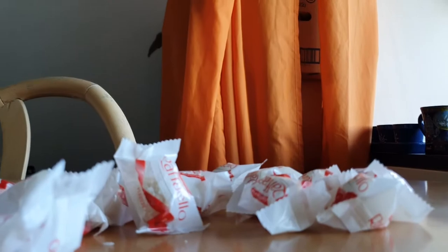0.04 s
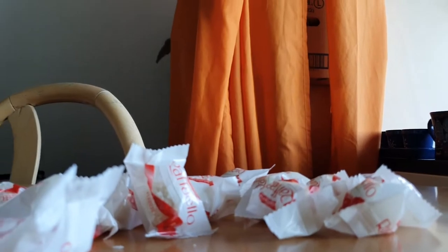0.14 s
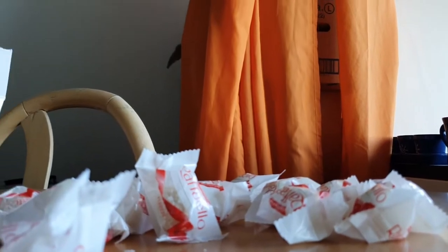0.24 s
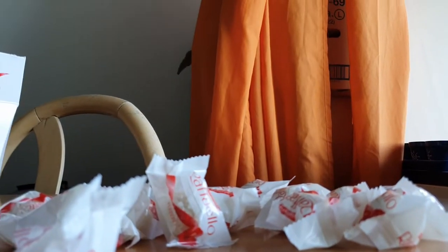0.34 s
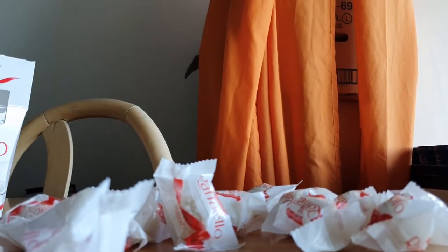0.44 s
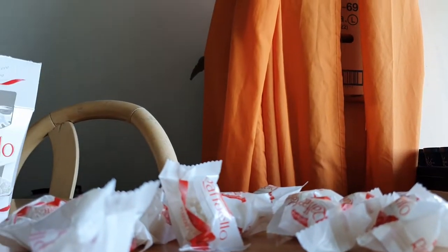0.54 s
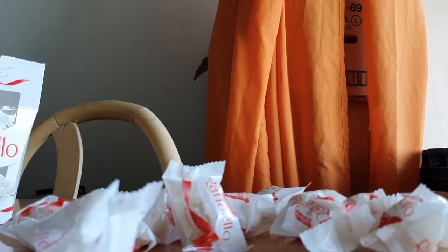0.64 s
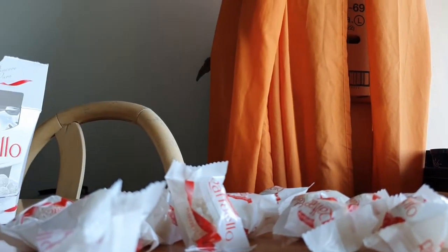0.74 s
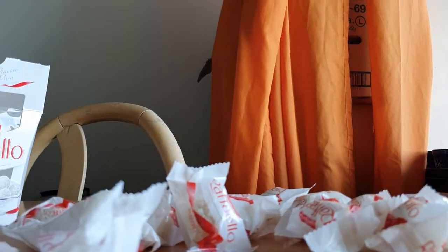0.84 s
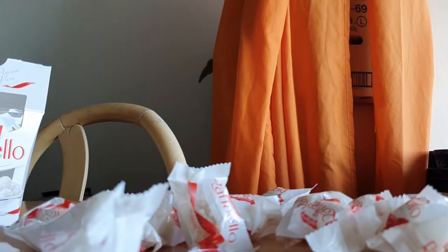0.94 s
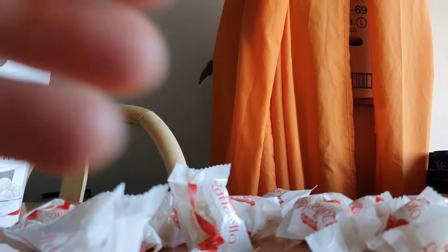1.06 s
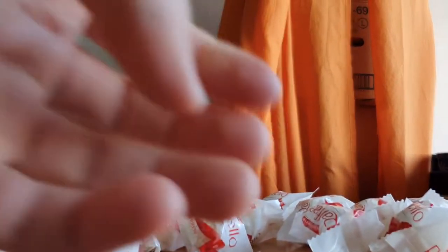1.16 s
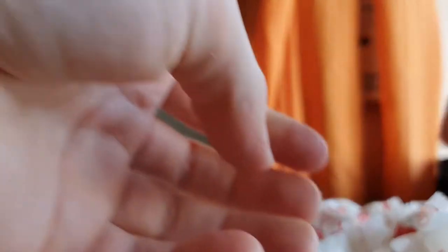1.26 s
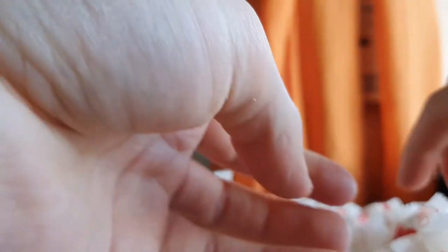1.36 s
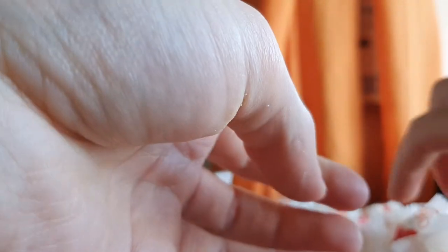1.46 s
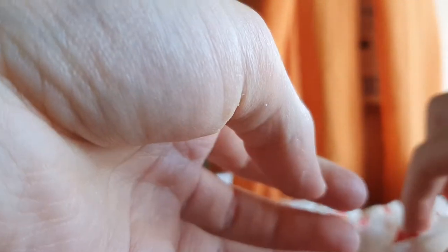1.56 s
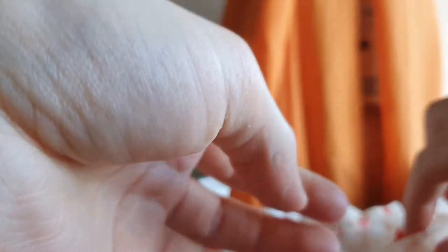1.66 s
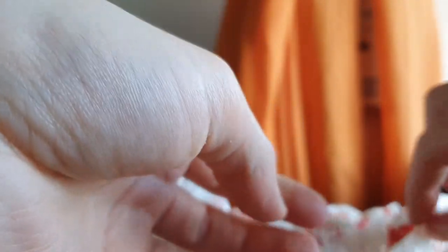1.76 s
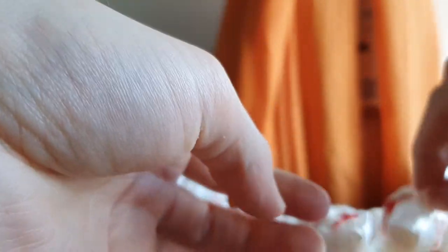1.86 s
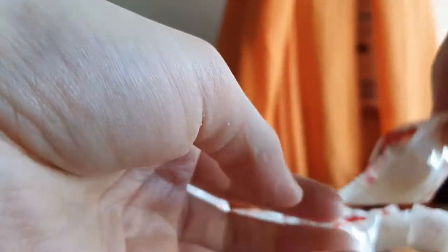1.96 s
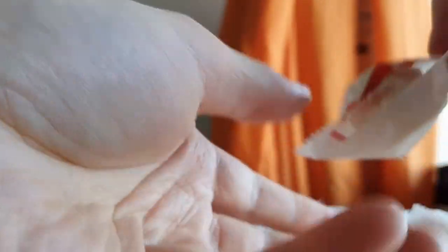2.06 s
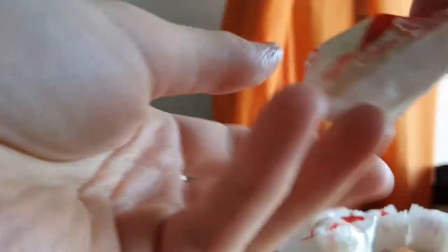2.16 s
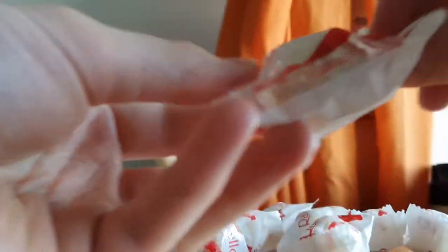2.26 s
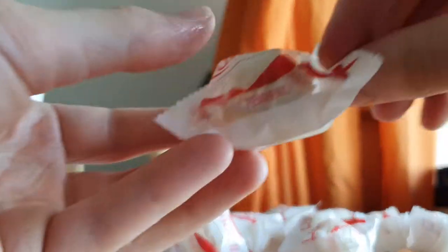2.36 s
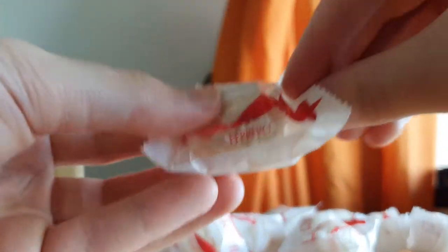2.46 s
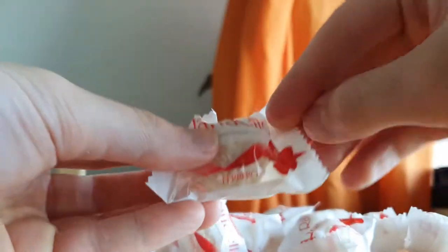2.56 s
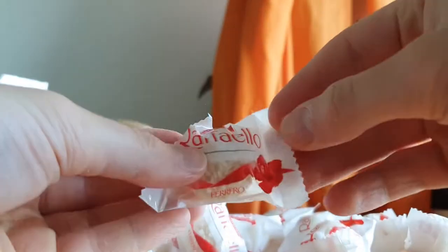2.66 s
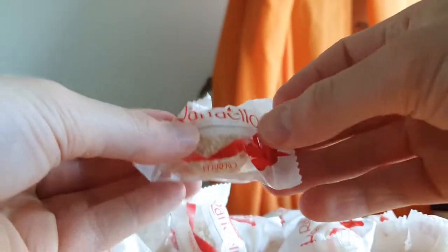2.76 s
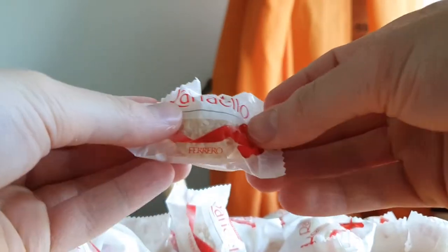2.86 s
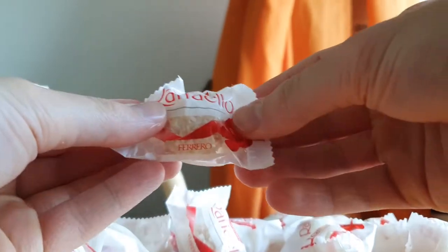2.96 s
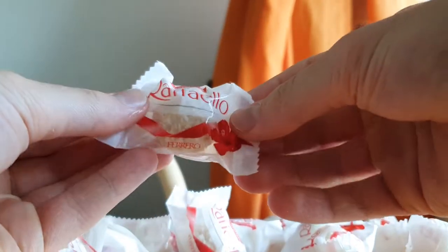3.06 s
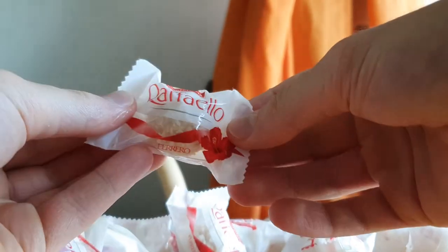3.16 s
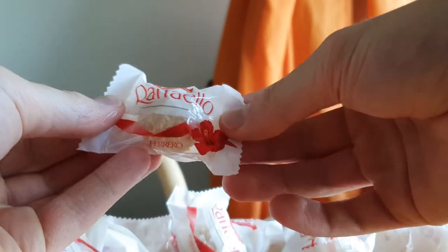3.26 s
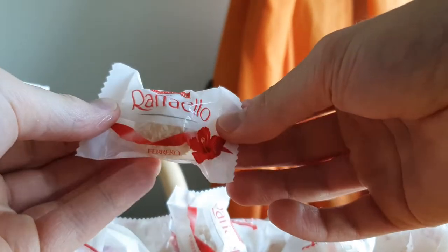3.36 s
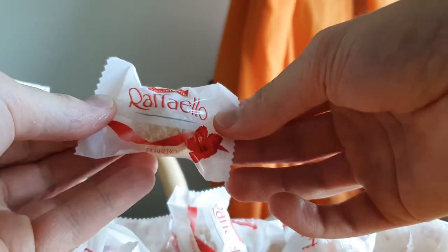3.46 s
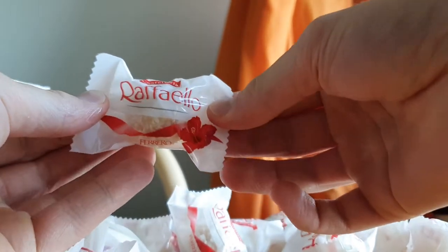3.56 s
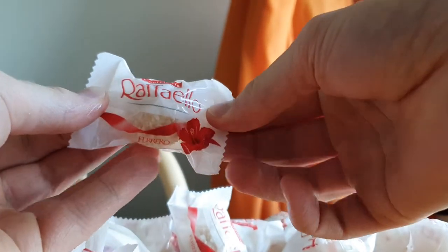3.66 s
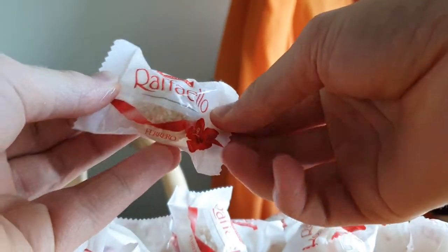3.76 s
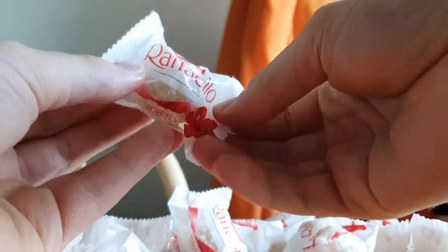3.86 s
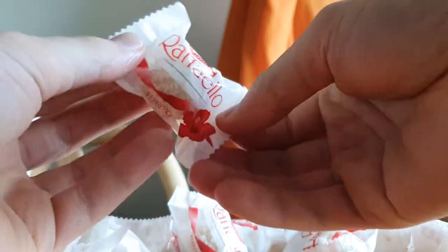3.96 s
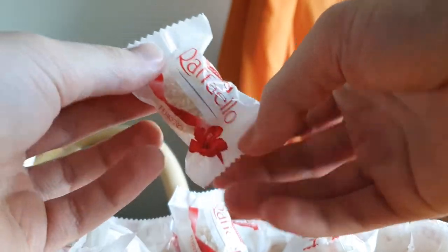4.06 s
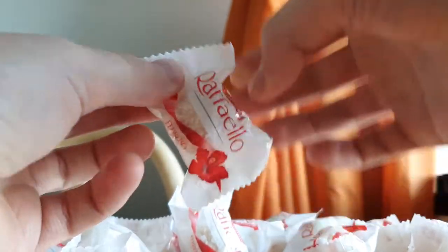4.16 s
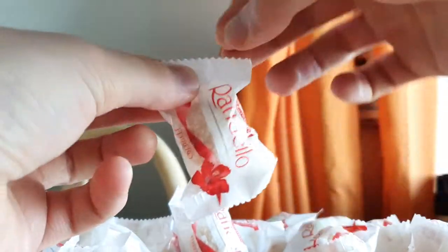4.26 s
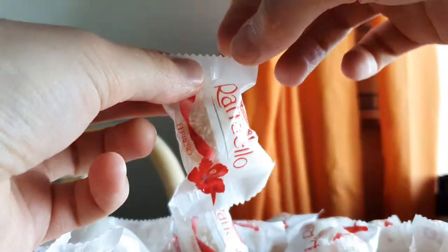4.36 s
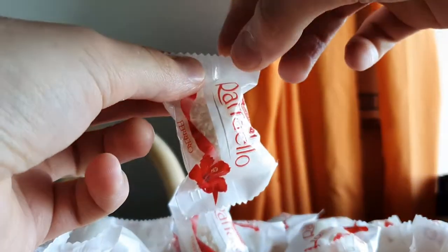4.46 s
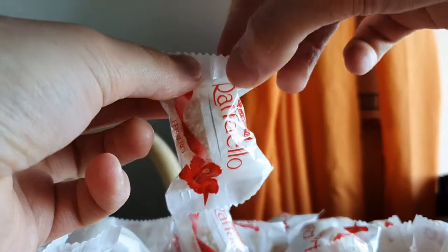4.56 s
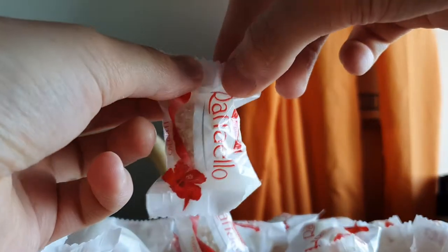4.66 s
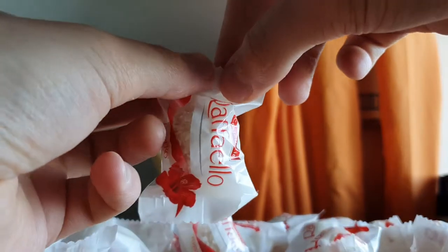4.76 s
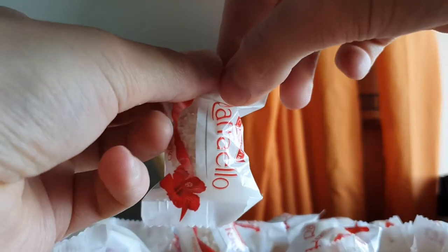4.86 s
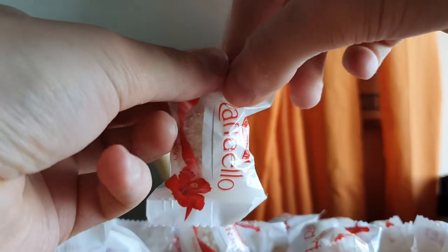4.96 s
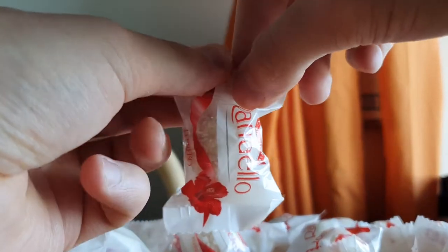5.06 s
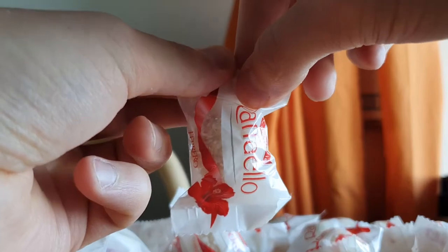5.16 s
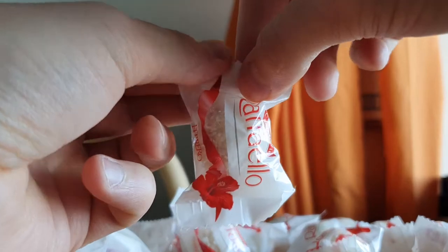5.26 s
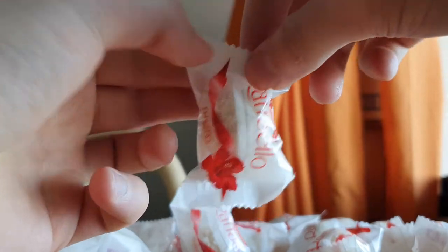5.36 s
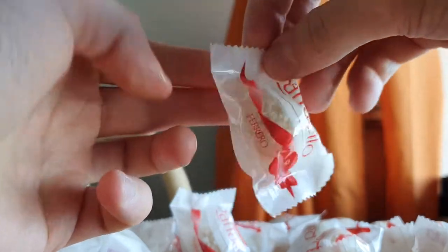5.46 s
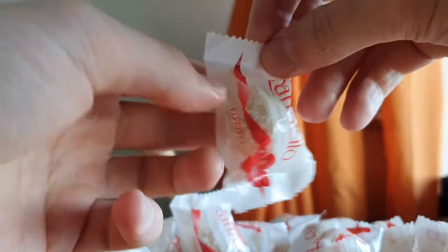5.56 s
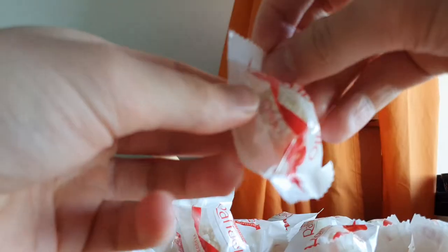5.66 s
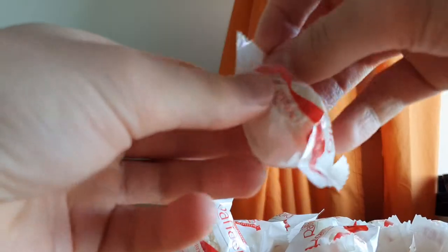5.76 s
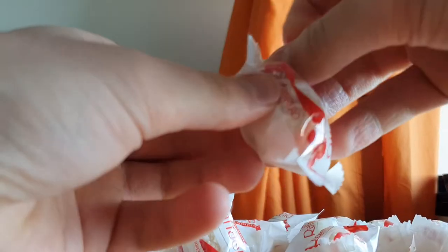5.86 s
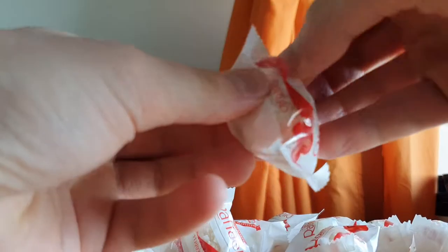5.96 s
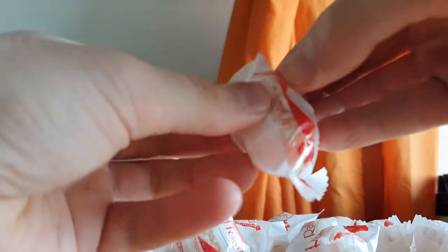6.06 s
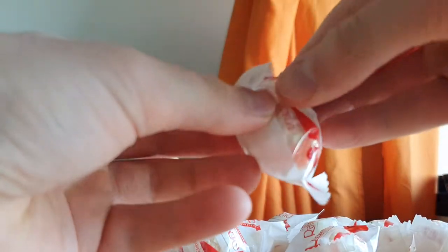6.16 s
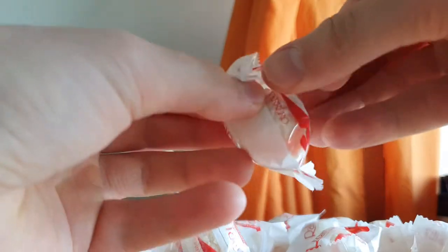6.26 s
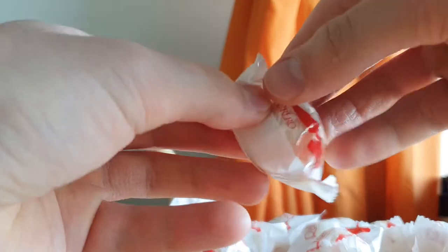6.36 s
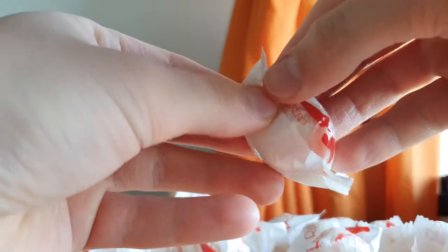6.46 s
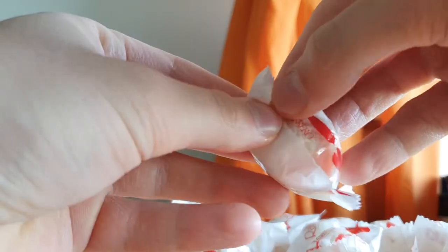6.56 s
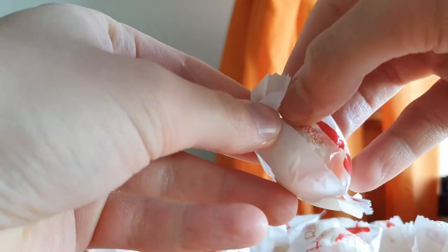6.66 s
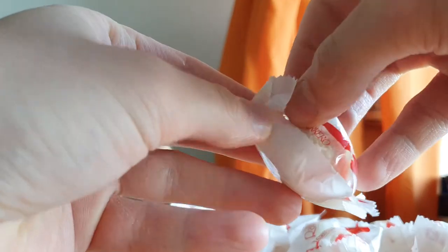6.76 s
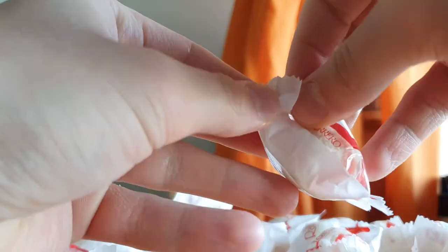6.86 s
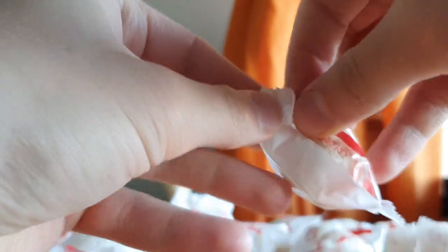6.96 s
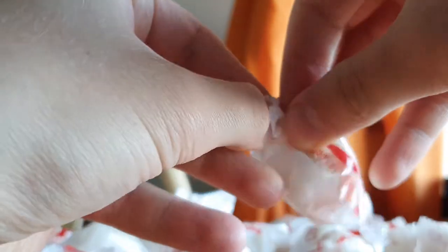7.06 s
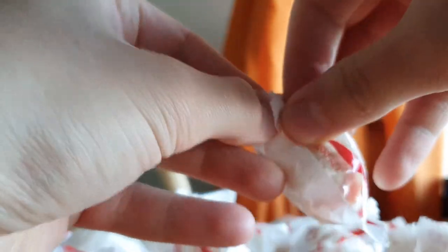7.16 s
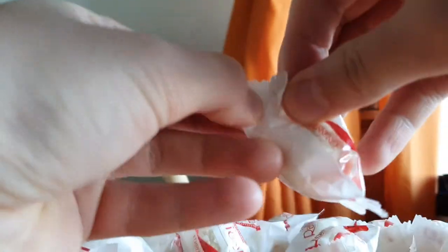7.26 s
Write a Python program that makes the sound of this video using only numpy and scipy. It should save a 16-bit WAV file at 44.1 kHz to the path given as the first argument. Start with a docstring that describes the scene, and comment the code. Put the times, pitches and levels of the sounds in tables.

```python
"""Small room: two hands pull open a sweet in a stiff plastic wrapper, close to a pair of microphones.
Large creases buckle one by one: noise bursts crack and sizzle, damped modes make the pouch pop hollowly.
Smaller creases crackle between them; coloured hiss is moving hands and sleeves, then rubbed film.
Short low sines are the sweet being knocked about, low-passed noise is the rumble of hands and room.
Decaying noise bands add the room's short bright tail."""
import sys
import numpy as np
from scipy import signal
from scipy.fft import rfft, irfft
from scipy.io import wavfile

SR = 44100
rng = np.random.default_rng(int(sys.argv[2]) if len(sys.argv) > 2 else 0)


def persist_wave(psi):
    """Save psi, clipped to +-1, as 16-bit WAV."""
    counts = np.round(np.clip(psi, -1, 1) * 32767).astype(np.int16)
    wavfile.write(sys.argv[1], SR, np.atleast_2d(counts).T)


N = 322371


def from_db(db):
    """Decibels to amplitude gain."""
    return 10 ** (np.asarray(db) / 20)


def rms_one(x):
    """Scale to rms 1."""
    return x / np.sqrt(np.mean(x ** 2) + 1e-20)


def in_time(rows):
    """Interpolate each column of a time table to every sample."""
    knot_s, *columns = np.transpose(rows)
    return [np.interp(np.arange(N) / SR, knot_s, column) for column in columns]


def at_hz(points, hz, axis=1):
    """Read a table column on a log-frequency axis."""
    points = np.array(points)
    return np.interp(np.log(np.maximum(hz, 1)), np.log(points[:, 0]), points[:, axis])


def band(x, edges_hz, order=2):
    """Causal band-pass."""
    return signal.sosfilt(signal.butter(order, edges_hz, "band", fs=SR, output="sos"), x)


def colour(x, points):
    """Minimum-phase filter with the tabulated gain, from a folded cepstrum."""
    size = 4096
    hz = np.arange(size // 2 + 1) * SR / size
    cepstrum = irfft(np.log(from_db(at_hz(points, hz))))
    cepstrum[1:size // 2] *= 2
    cepstrum[size // 2 + 1:] = 0
    response = irfft(np.exp(rfft(cepstrum)))
    return signal.fftconvolve(x, response[None], axes=1)[:, :N]


def pair_noise(shape, alike):
    """Left and right white noise with correlation alike."""
    alike = np.clip(alike, 0, 1)
    mid, side = rng.standard_normal((2, *shape))
    return np.sqrt((1 + alike) / 2) * mid + np.sqrt((1 - alike) / 2) * np.array([side, -side])


def drift(knots_per_s):
    """Random curve about 0: unit-variance knots joined by straight lines."""
    knots = rng.standard_normal(8192)
    return np.interp(np.arange(N) / SR * knots_per_s, np.arange(len(knots)), knots)


def flip(age_s, rise_s, decay_s):
    """Exponential rise up to age 0, exponential decay after it."""
    return np.exp(np.minimum(age_s / rise_s, -age_s / decay_s))


# Low rumble of the moving hands and the room: t/s, level/dB
RUMBLE = [(0.0, -68.5), (0.53, -73.5), (1.79, -59.5), (2.52, -62), (2.69, -57.5), (3.13, -55), (3.64, -59),
          (3.91, -55), (4.38, -63), (4.99, -56.5), (5.29, -65), (5.35, -55), (5.76, -60), (5.8, -52),
          (5.86, -58.5), (7.31, -59)]
# Rumble filter: f/Hz, gain/dB
RUMBLE_COLOUR = [(15, -20), (25, -13), (39, -8), (93, -3), (189, -1), (236, -3.5), (271, -1), (487, -13),
                 (600, -13), (700, -10.5), (910, -39), (1540, -120)]


def rumble(level_db, lumpy_db=2):
    """Soft, lumpy low noise, nearly the same at both microphones."""
    lumpy = pair_noise((N,), .89) * from_db(lumpy_db * drift(30))
    noise = colour(lumpy, RUMBLE_COLOUR)
    return rms_one(noise) * from_db(in_time(RUMBLE)[0] + level_db)


# Rustle level before trims: moving hands, sleeves and quiet hiss at first, handled film from 1.6 s;
# drives rubbing and fine crackle: t/s, pouch/dB, crack/dB, sizzle/dB
RUSTLE = [(0.0, -66.5, -59, -74), (0.25, -76.5, -76, -82.5), (0.48, -75.5, -75, -78.5),
          (0.72, -79, -68.5, -73), (0.95, -79, -82, -82), (1.2, -76, -65.5, -79.5), (1.55, -65.5, -61, -74),
          (1.8, -53, -47, -60), (2.0, -61, -58, -67), (2.2, -47.5, -57, -60), (2.42, -69.5, -56, -60),
          (2.8, -41.5, -50, -61), (3.2, -51.5, -48.5, -48.5), (3.66, -59, -51, -61),
          (3.95, -38, -42, -40.5), (4.2, -65, -56, -61.5), (4.43, -71.5, -75, -77), (4.62, -61, -63, -72.5),
          (4.9, -46.5, -46, -52), (5.2, -77, -70, -79), (5.42, -47.5, -50, -50.5), (5.8, -55.5, -45, -46),
          (6.1, -47.5, -39, -43), (6.38, -57.5, -45.5, -42.5), (6.48, -56.5, -55, -55),
          (6.62, -54, -44, -43), (6.95, -62.5, -52.5, -48.5), (7.158, -61.5, -50, -41.5),
          (7.31, -52, -41, -39)]
# Rubbing filter: f/Hz, gain/dB
RUSTLE_COLOUR = [(400, 1), (620, 0), (780, 2.5), (1050, 5), (1420, -4.5), (1760, -6.5), (2200, -6),
                 (3000, -4.5), (4000, 2.5), (5000, -5), (6200, -4), (9100, -5.5), (10400, -5.5),
                 (12200, -1.5), (16000, -11)]
# Rows pouch, crack, sizzle: low edge f/Hz, high edge f/Hz
RANGES = [(400, 2200), (2200, 7000), (7000, 17000)]
# Rubbing relative to rustle level: pouch/dB, crack/dB, sizzle/dB
RUB_DB = (-1.5, -2, 2)
# Hard-worked film buckles rather than slides: above the knee, rubbing loses this share of the dB rise
RUB_KNEE_DB, RUB_LAG = -64, (0.26, 0.33, 0.76)


def sliding(uneven_db, flicker_db=1.0):
    """Hands and sleeves, then skin on film, rub with an uneven hiss that keeps changing colour."""
    out = 0
    grip = from_db(uneven_db * (drift(130) + drift(23)) / np.sqrt(2))
    correlations = (.65, .2, .1)
    for edges_hz, rustle_db, trim_db, lag, alike in zip(RANGES, in_time(RUSTLE), RUB_DB, RUB_LAG, correlations):
        hiss = colour(band(pair_noise((N,), alike), edges_hz, order=3), RUSTLE_COLOUR)
        rub_db = rustle_db - lag * np.maximum(rustle_db - RUB_KNEE_DB, 0)
        out = out + rms_one(hiss) * from_db(rub_db + trim_db + flicker_db * drift(52))
    return out * grip


SNAP_S, LEAD_S = .025, .006  # burst length; part of it before the flip
LEVEL_S = .004  # time over which a burst's energy is referred to its level
AGE_S = np.arange(int(SNAP_S * SR)) / SR - LEAD_S


def at_level(bursts, db):
    """Give each stereo burst the energy of its level held for LEVEL_S."""
    energy = (bursts ** 2).sum(-1).mean(0) / (LEVEL_S * SR)
    return bursts * (from_db(db) / np.sqrt(energy + 1e-20))[:, None]


# Envelopes: rise/s, first decay/s, flutter level/dB, flutter decay/s
POP_SHAPE = (.0003, .001, -12, .003)
CRACK_SHAPE = (.0003, .0009, -7, .0026)
SIZZLE_SHAPE = (.0002, .0005, -11, .0022)


def crack(db, edges_hz, shape, alike, facet_db=3, lead_in_db=-9.5):
    """A soft, faint lead-in, then a noise burst of about a millisecond and a fluttering tail."""
    rise_s, decay_s, flutter_db, flutter_s = shape
    early, size, phase = rng.random((len(db), 3)).T[:, :, None]
    main = flip(AGE_S, rise_s, decay_s)
    flutter = from_db(flutter_db) * flip(AGE_S, rise_s, flutter_s)
    lead_in = from_db(lead_in_db) * flip(AGE_S + early * LEAD_S, rise_s, decay_s)
    waves = pair_noise((len(db), len(AGE_S)), alike) * (main + flutter + lead_in)
    # the flipping facet rings for a few cycles at a pitch set by its size
    facet_hz = edges_hz[0] * (edges_hz[1] / edges_hz[0]) ** size
    facet = np.sin(2 * np.pi * (facet_hz * AGE_S + phase)) * main
    # scaled to the share of the noise that the band passes
    facet = facet * from_db(facet_db) * np.sqrt(np.diff(edges_hz) / (SR / 2))
    return at_level(band(waves + facet, edges_hz, order=3), db)


# Pouch resonances: multiple of crease pitch, level/dB, t60/s
POUCH_MODES = [(.55, -17.5, 0.0096), (.8, -6.5, .013), (1.03, -1, .011), (1.48, -9, .019)]


def pop(hz, db, spread_db, detune, rough_db):
    """The flip kicks the pouch, whose heavily damped modes shift as it is bent."""
    out = 0
    for multiple, mode_db, t60_s in POUCH_MODES:
        strength, shift, tilt = rng.standard_normal((len(hz), 3)).T[:, :, None]
        mode_hz = hz[:, None] * multiple * np.exp(detune * shift)
        wall = np.sin(2 * np.pi * mode_hz * AGE_S)
        wall = wall * flip(AGE_S, POP_SHAPE[0], t60_s / np.log(1000))
        # sound follows wall acceleration, so little is radiated below each mode
        wave = np.gradient(np.gradient(wall, axis=1), axis=1) / multiple ** 2
        sides = from_db(0.81 * np.array([tilt, -tilt]))
        out = out + sides * wave * from_db(mode_db + spread_db * strength)
    grain = crack(db + rough_db, RANGES[0], POP_SHAPE, alike=0.92)
    return at_level(band(out, [450, 2300], order=3), db) + grain


# Wrapper position: t/s, mean lead of the left microphone/ms
PLACE = [(1.7, -0.091), (2.3, 0.046), (3.2, 0.14), (4.8, .15), (5.8, .08), (7.31, 0.056)]


def buckles(rows):
    """Buckling creases, each a pop, a crack and a sizzle from its own spot on the wrapper."""
    start_s, hz, pop_db, crack_db, sizzle_db = np.transpose(rows)
    bursts = pop(hz, pop_db - .7, spread_db=1.5, detune=0.066, rough_db=-14.5)
    bright = crack(crack_db, RANGES[1], CRACK_SHAPE, alike=0.76)
    bright = bright + crack(sizzle_db, RANGES[2], SIZZLE_SHAPE, alike=0.43)
    # a facet may face either microphone
    facing_db = .5 * rng.standard_normal((len(start_s), 1))
    bursts += bright * from_db([facing_db, -facing_db])
    lead_ms = np.interp(start_s, *np.transpose(PLACE)) + .05 * rng.standard_normal(len(start_s))
    half_lead_s = lead_ms / 2000
    out = np.zeros((2, N + 2 * len(AGE_S)))
    for side, flips_s in enumerate([start_s - half_lead_s, start_s + half_lead_s]):
        starts = np.clip((flips_s - LEAD_S) * SR, 0, N).astype(int)
        for start, burst in zip(starts, bursts[side]):
            out[side, start:start + len(AGE_S)] += burst
    return out[:, :N]


# Tiny crease relative to rustle level: pop/dB, crack/dB, sizzle/dB
CRACKLE_DB = (-2, 1.5, 2)
YIELD_DB, YIELD_WIDTH_DB = -56.5, 3  # rustle level at which half give way; softness of that onset


def fine_crackle(spread_db, tint_db, pouch_hz, pitch_spread, count=680):
    """Tiny creases give way at random: more of them, and louder, the higher the rustle level."""
    when, luck = rng.random((count, 2)).T
    # columns: loudness, pitch, then pop, crack and sizzle tint
    chance = np.clip(rng.standard_normal((count, 5)), -2, 2)
    rustle_db = np.transpose([db[(when * N).astype(int)] for db in in_time(RUSTLE)])
    yield_chance = 1 / (1 + np.exp((YIELD_DB - rustle_db.mean(1)) / YIELD_WIDTH_DB))
    gives = luck < yield_chance
    levels_db = rustle_db + CRACKLE_DB + spread_db * chance[:, :1] + tint_db * chance[:, 2:]
    levels_db = np.where(gives[:, None], levels_db, -np.inf)
    hz = pouch_hz * np.exp(pitch_spread * chance[:, 1])
    return buckles(np.column_stack([when * N / SR, hz, levels_db]))


# Slips of film over film: peak t/s, swell/s, fade/s, pouch level/dB, crack level/dB, sizzle level/dB
SLIPS = [(.64, 0.026, 0.049, -69.5, -67.5, -88), (1.32, 0.0086, 0.043, -69, -62.5, -61.5),
         (1.70, 0.035, 0.033, -50, -46, -52), (2.338, 0.009, 0.0056, -40, -40.5, -42),
         (2.56, 0.061, 0.018, -48, -53, -52), (2.83, 0.023, 0.014, -51, -51, -55),
         (2.882, 0.028, 0.027, -45, -57, -60), (2.935, 0.016, 0.0068, -39.5, -46, -39.5),
         (3.165, .017, 0.0091, -37, -33.5, -42), (3.742, .012, 0.0038, -46, -50, -49),
         (3.871, 0.017, 0.011, -39.5, -34, -42), (4.113, 0.014, 0.011, -38.5, -38.5, -38.5),
         (4.505, 0.0033, 0.0096, -47, -58, -54), (4.566, 0.019, .022, -52.5, -54.5, -60),
         (5.485, .0035, 0.0073, -36, -40.5, -50), (5.803, 0.038, 0.006, -42, -35, -35),
         (6.39, 0.044, 0.028, -51, -39, -45)]


def slips(catch_db):
    """Film drags over film in a swell of tiny catches."""
    t = np.arange(N) / SR
    power = np.zeros((3, N))
    for peak_s, swell_s, fade_s, *levels_db in SLIPS:
        swell = flip(np.clip(t - peak_s, -.5, .5), swell_s, fade_s)
        power += (from_db(levels_db)[:, None] * swell) ** 2
    catches = rms_one(from_db(catch_db * drift(900)))
    out = 0
    for edges_hz, range_power, alike in zip(RANGES, power, (.7, .3, .2)):
        hiss = band(pair_noise((N,), alike) * catches, edges_hz, order=3)
        out = out + rms_one(hiss) * np.sqrt(range_power)
    return out


# Large creases, levels before trims: t/s, pouch pitch f/Hz, pop level/dB, crack level/dB, sizzle level/dB
SNAPS = [(1.5703, 1330, -54, -42.5, -61), (1.6542, 1930, -38.5, -40.5, -39), (1.6915, 1130, -45, -37, -56),
         (1.7076, 2090, -36, -29, -41), (1.7827, 1010, -45.5, -58, -65), (1.892, 1340, -31.5, -35.5, -50),
         (1.8966, 1120, -38.5, -32, -38.5), (2.0337, 1050, -49.5, -58, -70),
         (2.0466, 1054, -42.5, -39, -34), (2.1186, 1090, -44.5, -41, -49), (2.1747, 1220, -46, -45, -53),
         (2.2157, 1190, -37, -31.5, -39), (2.2766, 1040, -47.5, -59, -64), (2.3414, 1100, -37, -37, -29.5),
         (2.4604, 1490, -40, -39, -37.5), (2.4866, 1060, -38.5, -51, -60),
         (2.4943, 1110, -36.5, -34.5, -38.5), (2.5643, 1040, -40.5, -38.5, -61),
         (2.5854, 1680, -50, -28.5, -27), (2.6076, 810, -31, -41, -47), (2.6232, 925, -30, -29.5, -26.5),
         (2.703, 1070, -50, -43, -43), (2.738, 940, -41, -37, -42), (2.7678, 1820, -36.5, -35, -47),
         (2.7808, 1290, -27.5, -22.5, -30), (2.79, 1100, -32.5, -32.5, -26),
         (2.8192, 2160, -23.5, -28, -32), (2.8468, 1560, -52, -34, -28), (2.8636, 1190, -27.5, -30, -24),
         (2.929, 1110, -37, -33, -48), (2.9385, 1070, -31.5, -47, -35), (3.0181, 1880, -38, -36, -38),
         (3.054, 1130, -29, -29.5, -26), (3.0964, 1200, -36, -25.5, -29.5), (3.1274, 1120, -37, -33, -30),
         (3.137, 1300, -21.5, -26, -22), (3.159, 970, -28, -20, -26), (3.1703, 1080, -26.5, -20.5, -22.5),
         (3.2408, 1870, -37, -38, -33), (3.2534, 1020, -34, -26.5, -35), (3.2615, 914, -38.5, -39, -34),
         (3.3143, 1120, -39, -32.5, -43), (3.3232, 1450, -42, -37, -45), (3.3805, 1280, -34.5, -27.5, -36),
         (3.3946, 1130, -23.5, -37, -37), (3.4006, 940, -36, -31, -26.5), (3.4204, 1253, -16, -28.5, -31),
         (3.5079, 1930, -41, -40, -36), (3.5245, 1190, -31.5, -29.5, -33.5), (3.553, 1360, -36, -31.5, -46),
         (3.5743, 1260, -38.5, -57, -68), (3.6271, 1550, -44, -41, -51), (3.724, 1040, -38.5, -53, -66),
         (3.7438, 990, -35, -33.5, -31.5), (3.757, 1030, -53, -51, -38), (3.782, 630, -43, -34, -34.5),
         (3.8015, 850, -35, -46, -60), (3.8221, 637, -41.5, -36, -31), (3.8497, 880, -37, -41, -29),
         (3.8702, 790, -41, -29.5, -31), (3.9023, 1040, -31, -18, -21.5), (3.919, 776, -34.5, -26.5, -45),
         (3.9402, 960, -35.5, -38, -30.5), (4.0117, 920, -50, -30.5, -32), (4.0493, 1950, -61, -48, -38),
         (4.1097, 700, -35, -25, -26.5), (4.1674, 930, -44.5, -41, -40), (4.3687, 610, -49.5, -56, -52.5),
         (4.4508, 920, -66, -65, -56), (4.5027, 630, -38.5, -45.5, -39.5), (4.5693, 1130, -47, -48.5, -59),
         (4.6776, 630, -36.5, -34.5, -30.5), (4.703, 1230, -35.5, -30.5, -29),
         (4.8197, 960, -33.5, -33.5, -27), (4.8271, 940, -57, -48, -33), (4.8531, 930, -29, -25, -19.5),
         (4.9038, 1070, -33, -28, -31.5), (4.9172, 1160, -29, -31, -35), (4.9317, 720, -35.5, -48, -53),
         (4.9413, 1110, -29, -33.5, -35), (4.9576, 1050, -51, -34.5, -34), (4.9673, 890, -41, -43, -44),
         (4.9947, 1500, -51, -37.5, -33), (5.0003, 1080, -40, -47, -50), (5.0257, 1030, -31, -30.5, -32),
         (5.2377, 1070, -66, -55, -43.5), (5.3275, 1120, -44, -38.5, -41), (5.3383, 1030, -34, -33.5, -52),
         (5.3454, 1030, -37, -43, -27), (5.3623, 905, -33.5, -26, -24.5), (5.4349, 684, -37.5, -42, -52),
         (5.452, 1050, -37.5, -30, -34), (5.488, 720, -32, -26.5, -30), (5.51, 890, -32.5, -40, -43),
         (5.5605, 1300, -44, -25, -26), (5.569, 1120, -43, -43, -26), (5.5955, 1590, -27.5, -19, -21.5),
         (5.624, 1090, -42, -26, -32), (5.6759, 1700, -34.5, -26.5, -26), (5.7269, 1120, -34, -27.5, -37),
         (5.7405, 1640, -36, -32, -26.5), (5.758, 1480, -59, -30, -25), (5.7748, 1120, -25.5, -24.5, -26.5),
         (5.7931, 1030, -25, -30, -21), (5.8006, 1100, -33, -26, -32), (5.808, 1160, -29, -43, -40),
         (5.818, 830, -36, -38, -30), (5.8344, 1130, -32.5, -29.5, -22.5), (5.85, 990, -57, -38, -34),
         (5.8664, 1260, -50, -44, -26.5), (5.9232, 1800, -36, -24.5, -16.5),
         (5.9252, 1920, -41, -26, -19.5), (5.9335, 1090, -39, -22, -25), (5.9814, 1160, -20.5, -25, -24.5),
         (5.9875, 930, -41, -24.5, -24), (6.021, 1950, -34, -22.5, -29), (6.0293, 1180, -23, -24, -25.5),
         (6.0594, 1040, -34, -30, -24.5), (6.0642, 1350, -37, -31, -31), (6.102, 1870, -28.5, -23.5, -23.5),
         (6.1331, 1330, -46, -30.5, -32), (6.1592, 1160, -46, -32, -32), (6.1789, 1710, -38.5, -34, -26),
         (6.2402, 1930, -47, -38, -33.5), (6.255, 1750, -40.5, -35, -38), (6.3069, 2090, -35, -27, -29),
         (6.3394, 1460, -35, -25, -21.5), (6.3506, 1920, -25.5, -34, -32), (6.3705, 1620, -36, -27, -25),
         (6.4355, 1430, -41, -37.5, -39), (6.5282, 1290, -30, -24.5, -15.5), (6.58, 1440, -25, -30, -29),
         (6.5829, 1650, -28, -23, -18.5), (6.618, 1480, -38.5, -30, -30), (6.649, 940, -46, -32, -22),
         (6.682, 2080, -40, -30, -27.5), (6.6929, 1280, -38, -51, -39), (6.7439, 1980, -45, -37.5, -31.5),
         (6.7843, 2100, -47, -32, -31), (6.8115, 1990, -40, -27.5, -23.5), (6.827, 1470, -48, -35, -29.5),
         (6.8876, 1250, -30.5, -27, -31.5), (6.9218, 1490, -47, -31, -18.5),
         (6.9711, 1140, -59, -37.5, -36.5), (7.0076, 1860, -46.5, -43, -26.5),
         (7.0257, 1980, -53, -36.5, -37), (7.0933, 1920, -36.5, -35, -26.5), (7.112, 1490, -41.5, -34, -35),
         (7.1935, 1690, -49, -52, -35), (7.2305, 2070, -50, -34, -24), (7.2375, 1800, -37, -33, -40),
         (7.2482, 1930, -31.5, -21, -24), (7.273, 1610, -52, -28, -28), (7.2943, 1820, -30.5, -30.5, -37)]
# Trim of those levels: pop/dB, crack/dB, sizzle/dB
SNAP_DB = (0.42, -0.3, 0.44)


def snaps():
    """The large creases buckle one by one."""
    return buckles(np.array(SNAPS) + [0, 0, *SNAP_DB])


AFTER_S, NEIGHBOUR_DB = .006, -14.5  # mean gap; mean level relative to SNAPS


def neighbours(spread_db, pitch_spread):
    """Each large crease sets off a smaller one beside it just afterwards."""
    rows = np.array(SNAPS)
    gaps_s = AFTER_S * rng.exponential(1, len(rows))
    # columns: pitch, then pop, crack and sizzle level
    chance = np.clip(rng.standard_normal((len(rows), 4)), -2, 2)
    levels_db = rows[:, 2:] + NEIGHBOUR_DB + spread_db * chance[:, 1:]
    hz = rows[:, 1] * np.exp(pitch_spread * chance[:, 0])
    return buckles(np.column_stack([rows[:, 0] + gaps_s, hz, levels_db]))


# Soft bumps of the fingers on the sweet: t/s, f/Hz, envelope peak level/dB, decay/s
BUMPS = [(2.72, 365, -37.5, 0.0044), (2.779, 246, -37, 0.0025), (2.94, 190, -43, 0.0061),
         (3.025, 305, -40, 0.0052), (3.069, 114, -43, 0.012), (3.09, 99, -43.5, 0.018),
         (3.11, 168, -45, 0.0082), (4.112, 317, -51.5, 0.0087), (5.786, 329, -50, 0.02)]


def bumps(rise_s=0.0019):
    """Fingertips knock the sweet about inside its wrapper: a few dull sine cycles each."""
    out = np.zeros(N)
    age_s = np.arange(int(.15 * SR)) / SR - .02
    for bump_s, hz, db, decay_s in BUMPS:
        start = int((bump_s + age_s[0]) * SR)
        thud = np.sin(2 * np.pi * hz * age_s) * flip(age_s, rise_s, decay_s)
        out[start:start + len(age_s)] += from_db(db) * thud
    return out


# Room tail: f/Hz, level before band-pass/dB, t60/s
ROOM = [(299, -2.5, .17), (947, -17, 0.25), (2110, -9, 0.19), (3780, -8, 0.22), (7700, -11.5, 0.15),
        (13500, -12, 0.086)]


def room(x, build_s):
    """Diffuse reflections build up and die away, band by band, less alike at high pitch."""
    t = np.arange(int(.7 * SR)) / SR
    edges_hz = np.geomspace(200, 18000, 9)
    response = 0
    for low_hz, high_hz in zip(edges_hz, edges_hz[1:]):
        hz = np.sqrt(low_hz * high_hz)
        t60_s = at_hz(ROOM, hz, axis=2)
        envelope = from_db(-60 * t / t60_s) * (1 - np.exp(-t / build_s))
        envelope *= from_db(at_hz(ROOM, hz)) / np.sqrt(np.sum(envelope ** 2))
        tail = pair_noise(t.shape, np.exp(-hz / 1500)) * envelope
        response = response + band(tail, [low_hz, high_hz])
    return signal.fftconvolve(x, response, axes=1)[:, :N]


# How differently the two microphones hear the wrapper: f/Hz, left minus right/dB
BALANCE_DB = [(250, -1.2), (600, 1), (1100, -0.1), (2500, .5), (5000, 1.6), (9000, 2.2), (13000, 3.5)]


def microphones(x):
    """Share the sound out between left and right, frequency by frequency."""
    sides = []
    for side, sign in enumerate((1, -1)):
        gain_db = [(hz, sign * db / 2) for hz, db in BALANCE_DB]
        sides.append(colour(x[[side]], gain_db))
    return np.vstack(sides)


# Filter on all creases and slips: f/Hz, gain/dB
FILM_COLOUR = [(200, 17), (400, 1), (500, 2), (610, 7), (760, 1), (950, 5), (1300, -2), (1700, -1.5),
               (2500, 0), (3500, 0), (7000, 0.5), (9000, 1.5), (10300, 0), (12400, 5.5), (15500, -2)]


def scene():
    """The wrapper close by, the room's tail on its creases and slips, low sounds underneath."""
    low = rumble(level_db=0.0) + bumps()
    rub = sliding(uneven_db=2.5)
    small = fine_crackle(spread_db=3, tint_db=2.5, pouch_hz=1190, pitch_spread=0.316)
    small = small + neighbours(spread_db=3.5, pitch_spread=0.22)
    large = slips(catch_db=1.5) + snaps()
    film = colour(large + small, FILM_COLOUR)
    return microphones(film + room(film, build_s=0.0025) + rub) + low


CUTOFF_HZ = 16100


def record(dry):
    """Clip peaks at full scale, then cut the top with a steep low-pass."""
    low_pass = signal.ellip(10, .2, 70, CUTOFF_HZ, fs=SR, output="sos")
    return signal.sosfilt(low_pass, np.clip(dry, -1, 1))


dry = scene()
out = record(dry)
persist_wave(out)
```